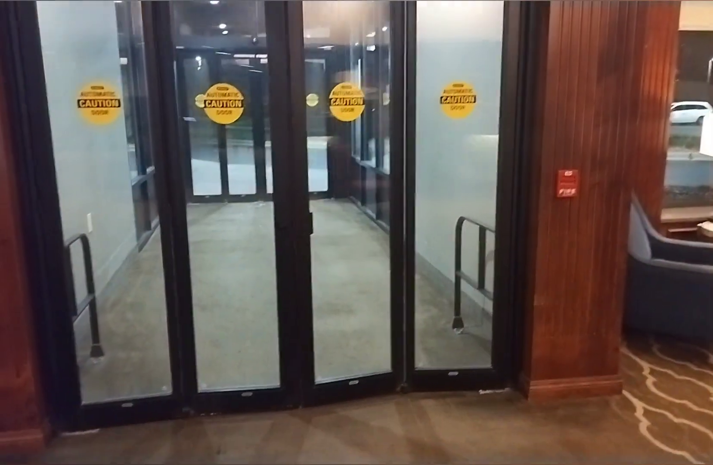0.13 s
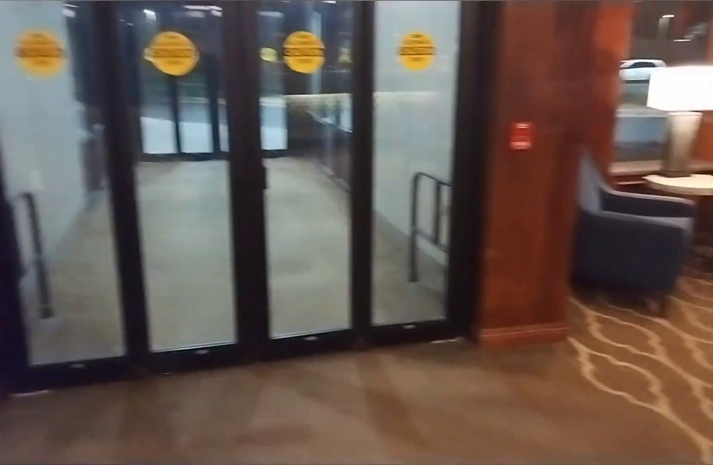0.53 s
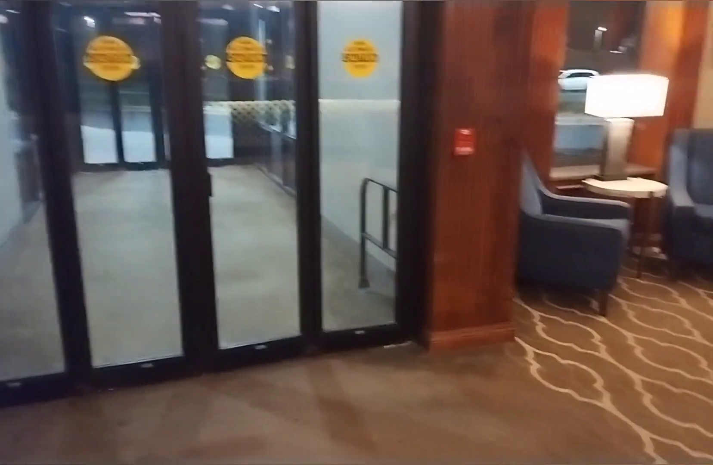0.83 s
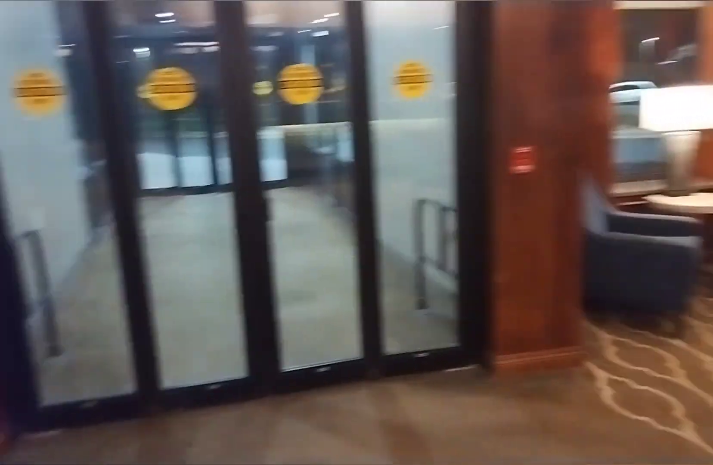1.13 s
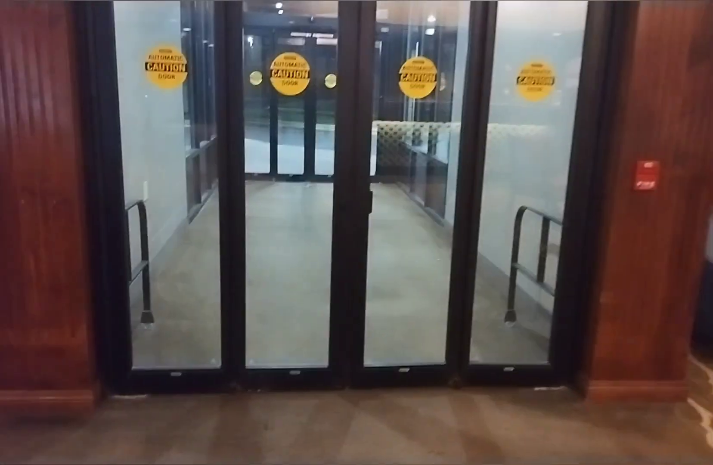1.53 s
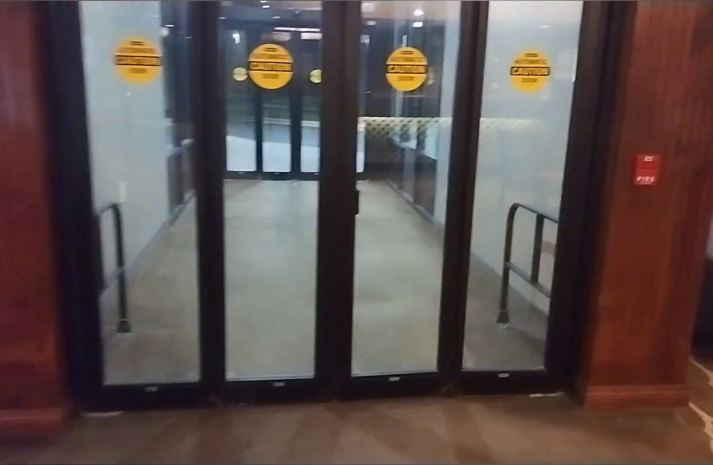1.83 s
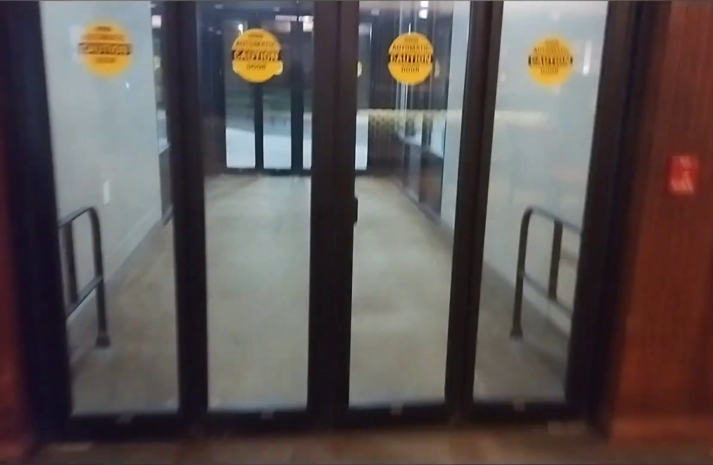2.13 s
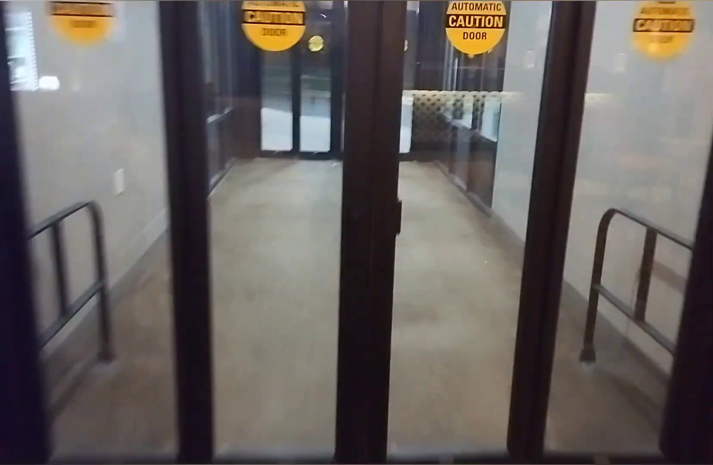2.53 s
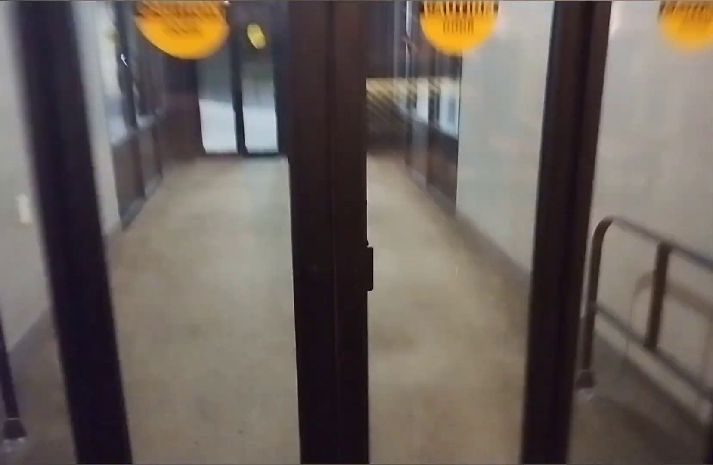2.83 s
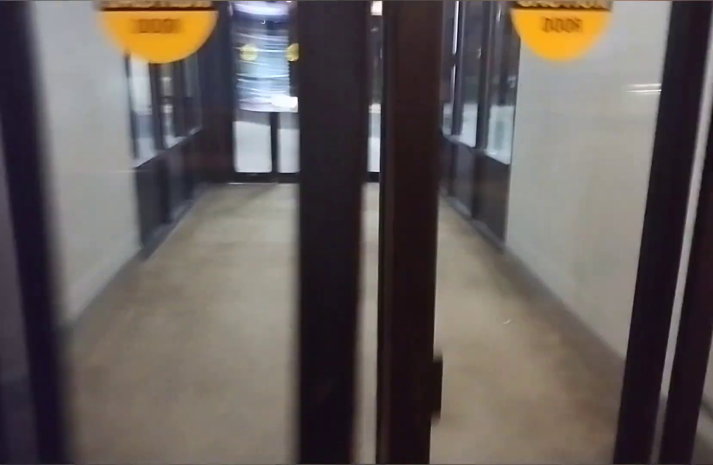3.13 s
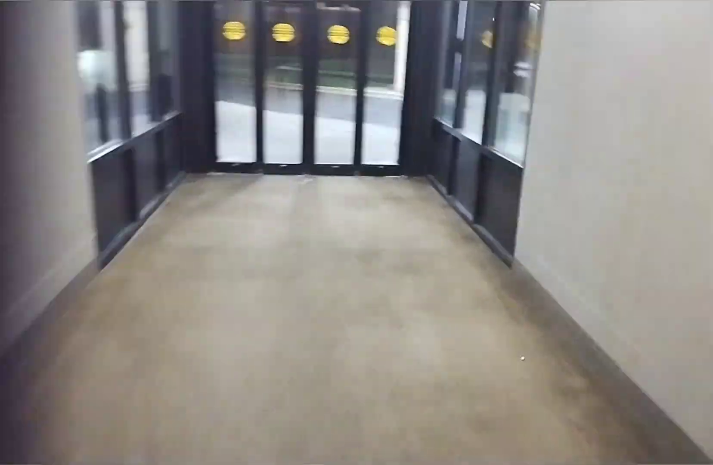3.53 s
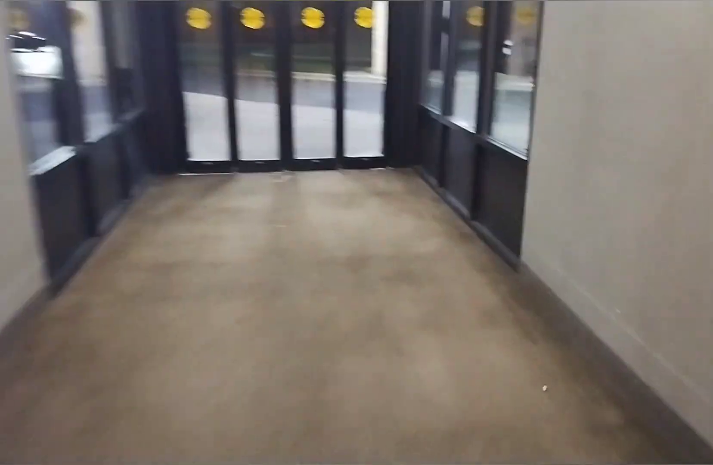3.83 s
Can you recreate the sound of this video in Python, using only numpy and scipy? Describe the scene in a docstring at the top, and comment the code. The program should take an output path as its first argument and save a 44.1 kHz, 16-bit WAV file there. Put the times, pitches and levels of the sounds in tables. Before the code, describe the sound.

Automatic folding glass doors scrape and shudder shut in a lobby. Low ventilation hums while a hand bumps and rubs the microphone. Then a motor whines and the doors rumble open, clacking in their metal frames.

```python
"""Automatic folding glass doors creep shut in a carpeted lobby and shudder into their seals.
Ventilation hums, and a hand bumps and rubs the camera. Then the drive's gears whine up and
the door leaves fold open, rumbling along their track and clacking in their metal frames."""
import sys
import numpy as np
from scipy import signal
from scipy.fft import rfft, irfft, next_fast_len
from scipy.io import wavfile
from scipy.ndimage import map_coordinates

SR = 44100
rng = np.random.default_rng(int(sys.argv[2]) if len(sys.argv) > 2 else 0)


def output_pcm(signal):
    """Save a mono or channel-first signal as 16-bit PCM at the path in sys.argv[1].

    Samples are clipped to [-1, 1] before scaling.
    """
    pcm = np.clip(np.atleast_2d(signal).T, -1, 1) * 32767
    wavfile.write(sys.argv[1], SR, np.round(pcm).astype(np.int16))


N = 176400

# The tone of a scraping seal and of a high brushing hiss. Each row: frequency in Hz, level in dB.
SEAL_TONE = [(300, -25), (450, -1.5), (880, 2), (1340, -3), (2100, 3), (3500, -7.5), (5000, -59)]
BRUSH_TONE = [(2200, -26), (3500, 2), (5200, -11), (6400, -6), (8500, -12), (10500, -24), (14000, -36)]
# How alike left and right sound. Each row: frequency in Hz, likeness (1 means the same).
STEREO_LIKENESS = [(40, 0.77), (280, 0.98), (1100, 0.0067)]


def amp(db):
    """Turn decibels into a gain."""
    return 10 ** (np.asarray(db) / 20)


def unit(x):
    """Scale x to an average (rms) level of 1."""
    return x / np.sqrt(np.mean(x ** 2) + 1e-20)


def decay(t, t60):
    """A fade that falls 60 dB in t60 seconds."""
    return np.exp(-np.log(1000) * t / t60)


def along(points, hz):
    """Read between (frequency, value) points on a log scale."""
    freqs, values = np.transpose(points)
    return np.interp(np.log(hz + 1), np.log(freqs + 1), values)


def curves(rows):
    """Turn rows that start with a time into one curve for each other column."""
    times, *columns = np.transpose(rows)
    return [np.interp(np.arange(N) / SR, times, column) for column in columns]


def wobble(rate):
    """A smooth random curve through `rate` points a second."""
    return map_coordinates(rng.standard_normal(int(N * rate / SR) + 4), [np.arange(N) * rate / SR])


def filtered(x, response):
    """Scale each frequency in x by response(hz)."""
    size = next_fast_len(N + SR // 2)
    return irfft(rfft(x, size) * response(np.fft.rfftfreq(size, 1 / SR)), size)[..., :N]


def sides(pan_db):
    """Left and right gains; a pan above 0 leans left."""
    gains = np.array([amp(np.atleast_1d(pan_db) / 2), amp(-np.atleast_1d(pan_db) / 2)])
    return gains / np.sqrt(np.mean(gains ** 2, axis=0))


def mid_side(hz):
    """Gains for what both ears share (mid) and what sets them apart (side)."""
    angle = np.arccos(np.clip(along(STEREO_LIKENESS, hz), -1, 1)) / 2
    return [np.cos(angle), np.sin(angle)]


def rush(tone, grain_db=0, grain_rate=220):
    """Stereo noise; grain_db roughens it into tiny random contacts."""
    # Which way the noise leans. Each row: frequency in Hz, pan in dB.
    lean = [(500, 0), (2300, -6), (4500, 4), (12000, -6)]
    noise = rng.standard_normal((2, N)) * amp(grain_db * wobble(grain_rate))
    mid, side = filtered(noise, lambda hz: amp(along(tone, hz)) * mid_side(hz))
    stereo = np.array([mid + side, mid - side])
    return unit(filtered(stereo, lambda hz: sides(along(lean, hz))))


def struck_panel(tone, t60, attack_s=0.00083):
    """A struck panel rings at many uneven pitches that die away together."""
    size, spacing_hz, uneven_db = SR // 3, 128.1, 5
    hz, t = np.fft.rfftfreq(size, 1 / SR), np.arange(size) / SR
    peaks = map_coordinates(rng.standard_normal(len(hz)), [hz / spacing_hz]) * hz / (hz + 1000)
    colour = amp(along(tone, hz) + uneven_db * peaks)
    mid, side = irfft(rfft(rng.standard_normal((2, size))) * colour * mid_side(hz), size)
    shape = (1 - np.exp(-t / attack_s)) * decay(t, t60)
    return unit(np.array([mid + side, mid - side]) * shape) * np.sqrt(np.mean(shape ** 2))


def add(out, start, x):
    """Mix x into out at `start` seconds."""
    i = max(round(start * SR), 0)
    out[:, i:i + x.shape[-1]] += x[..., :N - i]


def ventilation():
    """Moving air makes a steady, low rush."""
    # Each row: frequency in Hz, relative level in dB.
    air_tone = [(25, -8.5), (90, -6.5), (280, -8.5), (520, -17), (1300, -25), (2300, -22), (4000, -36),
                (14500, -42.5)]
    return amp(-65) * rush(air_tone)


def shutting():
    """The leaves scrub along their seals and the panes shudder."""
    # Each row: time in seconds, then shudder, seal and brush levels in dB before the fade.
    levels = [(.07, -61, -67, -76), (.18, -54, -57.5, -59.5), (.21, -53.5, -53, -57),
              (.35, -64, -62, -63.5), (.462, -51.5, -57.5, -65.5), (.476, -36, -40, -50),
              (.55, -44, -41, -49), (.64, -41, -43.5, -58.5), (.87, -41, -47.5, -63), (.91, -50, -57, -64),
              (1.0, -59, -59.5, -65), (1.5, -64.5, -69.5, -81)]
    # Each row: frequency in Hz, level in dB.
    shudder_tone = [(25, -18), (70, 0), (120, 0), (290, 0.5), (450, -13), (900, -55)]
    shudder_db, seal_db, brush_db = curves(levels)
    fade, = curves([(1.5, 0.82), (1.9, 0.1)])
    return fade * (amp(shudder_db) * rush(shudder_tone)
                   + amp(seal_db) * rush(SEAL_TONE, grain_db=2)
                   + amp(brush_db) * rush(BRUSH_TONE, grain_db=2.5))


def clacks():
    """Each contact rings the frame and snaps metal on metal; glass knocks and heavy leaves thud."""
    # Each row: start in seconds, ring level in dB, snap level in dB, the struck part's pitch in Hz.
    contacts = [(0.1829, -49.5, -47, 3350), (0.2274, -51, -56, 2430), (0.4528, -44.5, -47, 2540),
                (0.4718, -34.5, -40.5, 3330), (0.5025, -42, -39.5, 2130), (0.5355, -39, -43, 2960),
                (0.6525, -45, -45, 2060), (0.7487, -40, -49, 1950), (0.824, -47.5, -57, 2020),
                (0.9444, -54, -50, 3700), (1.0308, -52, -52, 3520), (1.113, -55.5, -59, 1940),
                (1.305, -58.5, -83, 1970), (1.395, -61.5, -87, 1920), (2.9599, -51.5, -51.5, 2180),
                (2.9747, -43, -65, 2400), (2.9889, -40, -33.5, 2930), (3.0409, -39, -36, 2690),
                (3.1017, -34.5, -50, 2370), (3.1754, -48, -41.5, 2300), (3.2895, -30, -53, 2580),
                (3.3345, -28, -38.5, 2300), (3.3443, -26.5, -69, 2310), (3.3853, -34, -56, 2580),
                (3.4371, -37.5, -53, 2310), (3.5394, -34.5, -55, 2710), (3.6432, -31.5, -49, 2390),
                (3.7988, -27.5, -48, 2330), (3.825, -33, -47, 1920), (3.8797, -28.5, -33, 1970),
                (3.921, -35.5, -56, 2168), (3.9492, -29.5, -49, 2520), (3.9769, -28, -34.5, 2030)]
    # Each row: start in seconds, level in dB.
    glass_knocks = [(0.1068, -48.5), (.4725, -40), (0.504, -45.5), (3.1006, -33), (3.1414, -28),
                    (3.3349, -24.5), (3.5685, -26), (3.95, -27)]
    # Each row: start in seconds, level in dB, pitch in Hz.
    leaf_thuds = [(.632, -30, 196), (3.331, -27, 137), (3.336, -27.5, 212.6)]
    # The tones of the hits. Each row: frequency in Hz, level in dB.
    frame_tone = [(500, -19), (2100, 9), (2900, 6), (3500, -13), (4400, -11), (7000, -89)]
    snap_tone = [(2700, -9), (3700, 9.5), (5000, -6), (6500, 3.5), (9000, -8.5), (13500, -21.5)]
    glass_tone = [(60, 16.5), (200, 16), (950, 21.5), (1400, 11), (2500, -54)]
    ring_t60, pitch_spread = 0.077, 1.39 ** 2
    out, t = np.zeros((2, N)), np.arange(SR // 3) / SR
    for start, ring_db, snap_db, hz in contacts:
        part = struck_panel([(hz / pitch_spread, -70), (hz, 0), (hz * pitch_spread, -70)], ring_t60)
        ring = (struck_panel(frame_tone, ring_t60) + part) * sides(pan_db=-4)
        snap = struck_panel(snap_tone, t60=0.03, attack_s=0.0005)
        add(out, start, amp(ring_db) * ring + amp(snap_db) * snap)
    for start, db in glass_knocks:
        add(out, start, amp(db) * struck_panel(glass_tone, t60=0.06))
    for start, db, hz in leaf_thuds:
        add(out, start, amp(db) * np.sin(2 * np.pi * hz * t) * decay(t, t60=0.13))
    return out


def handling():
    """Steps and fingers bump the camera's case into a dull ring; fingers also click, scrape and rub."""
    # Each row: start in seconds, level in dB, pan in dB.
    bumps = [(0.373, -42, -30), (1.109, -36, -38), (1.303, -38, -37), (2.198, -42, -11), (2.322, -44, -9),
             (2.495, -43, -12), (3.659, -14, 30), (3.678, -22, 24)]
    # Each row: pitch in Hz, level in dB.
    case_notes = [(105, -5.5), (160, -6), (340, -14)]
    # Each row: start in seconds, level in dB, treble limit in Hz.
    clicks = [(0.374, -28.5, 6960), (1.109, -32.5, 4020), (1.303, -34.5, 2400)]
    # Each row: start and length in seconds, level in dB, centre and width in Hz.
    rubs = [(1.127, 0.52, -63, 1980, 1050), (2.263, .06, -65, 835, 400), (2.438, 0.63, -70.5, 2144, 950),
            (2.639, 0.28, -63, 635, 130)]
    bump_attack_s, click_s = 0.002, 0.0011
    out, t = np.zeros((2, N)), np.arange(N) / SR
    age = t[:SR // 3]
    ring = sum(amp(db) * np.sin(2 * np.pi * hz * age) for hz, db in case_notes)
    thump = ring * decay(age, t60=0.093) * (1 - np.exp(-age / bump_attack_s))
    for start, db, pan_db in bumps:
        add(out, start, amp(db) * thump * sides(pan_db))
    pulse = (1 - age / click_s) * np.exp(-age / click_s)
    for start, db, top_hz in clicks:
        click = signal.sosfilt(signal.butter(4, top_hz, fs=SR, output="sos"), pulse)
        scrape = amp(-18.5) * struck_panel(SEAL_TONE, t60=0.085, attack_s=0.0054)
        add(out, start, amp(db) * (click + scrape) * sides(pan_db=-35))
    for start, length, db, centre, width in rubs:
        noise = rng.standard_normal((2, N))
        rub = unit(filtered(noise, lambda hz: 1 / (1 + (2 * (hz - centre) / width) ** 4) ** .5))
        swell = np.sin(np.pi * np.clip((t - start) / length, 0, 1))
        out += amp(db) * swell * rub * sides(pan_db=-5)
    return out


def opening():
    """Rollers rumble and chatter along the track."""
    # Each row: time in seconds, then relative rumble, track and brush levels in dB.
    levels = [(2.92, -61, -59, -68.5), (2.965, -59.5, -64, -68), (3.0, -45.5, -41, -55),
              (3.2, -41, -39.5, -60.5), (3.38, -39, -34.5, -64), (3.77, -38, -38.5, -67),
              (3.9, -38, -35, -52.5)]
    # Each row: frequency in Hz, level in dB.
    rumble_tone = [(32, -37), (68, 1.5), (130, 8.5), (175, 5), (380, 0.5), (800, -71)]
    track_tone = [(280, -8), (450, -3.5), (630, -9), (730, 0), (1110, -3.5), (1410, -10), (2350, -3),
                  (2900, -14), (4000, -58)]
    rumble_db, track_db, brush_db = curves(levels)
    return (amp(rumble_db) * rush(rumble_tone)
            + amp(track_db) * rush(track_tone, grain_db=2)
            + amp(brush_db) * rush(BRUSH_TONE, grain_db=3))


def drive():
    """The gears whine up, sag under the folding leaves and speed up again."""
    # Each row: time in seconds, shaft pitch in Hz, relative dB of its even and of its odd multiples.
    shaft = [(2.96, 112.7, -67, -75), (3.12, 136.9, -49, -60), (3.25, 151.9, -44, -61),
             (3.39, 140.2, -41.5, -46.5), (3.56, 140.6, -42, -41.5), (3.66, 143.9, -51, -41),
             (3.81, 156.8, -49.5, -43), (3.97, 169.4, -59, -48)]
    # Each row: multiple of the shaft pitch, added level in dB.
    gear_notes = [(1, -12), (4, -6), (5, 0), (6, -0.5), (7, -8.5), (8, -4.5)]
    hz, even_db, odd_db = curves(shaft)
    angle = 2 * np.pi * np.cumsum(hz * (1 + 0.00825 * wobble(60))) / SR
    out = np.zeros((2, N))
    for channel in out:
        for multiple, note_db in gear_notes:
            db = (odd_db if round(multiple) % 2 else even_db) + note_db + 4 * wobble(30)
            channel += amp(db) * np.sin(multiple * angle + 0.71 * wobble(45))
    return out


def lobby_echo(x):
    """The room's echo; each frequency dies at its own speed."""
    # Each row: frequency in Hz, seconds to fall 60 dB.
    echo_times = [(150, 0.34), (2500, 0.57), (13000, 0.26)]
    hz, t, noise = signal.stft(rng.standard_normal((2, SR)), SR, nperseg=256)
    tail = signal.istft(noise * decay(t, along(echo_times, hz)[:, None]), SR, nperseg=256)[1]
    return signal.fftconvolve(x, tail / np.linalg.norm(tail[0]), axes=1)[:, :N]


def ringing_frame(x):
    """The metal frame adds its own notes to whatever shakes it."""
    # Each row: pitch in Hz, width in Hz, level in dB.
    notes = [(2070, 8.7, 0.5), (2285, 13, -9), (3442, 36, 0.5)]
    return filtered(x, lambda f: 1 + sum(amp(db) * 1j * f * width / (hz * hz - f * f + 1j * f * width)
                                         for hz, width, db in notes))


def scene():
    """The doors shut and reopen, over handling noise and ventilation."""
    running, = curves([(2.88, 0.033), (2.93, 0.85)])  # turns up the drive and rollers
    machinery = clacks() + running * drive()
    doors = machinery + amp(-13) * lobby_echo(machinery) + shutting() + running * opening()
    return ringing_frame(doors) + handling() + ventilation()


def record(dry):
    """The camera cuts the deepest bass and the highest treble."""
    low_cut_hz, top_hz = 62, 14400
    thin = signal.sosfilt(signal.butter(2, low_cut_hz, "high", fs=SR, output="sos"), dry)
    return filtered(thin, lambda hz: hz < top_hz)


dry = scene()
out = record(dry)
output_pcm(out)
```